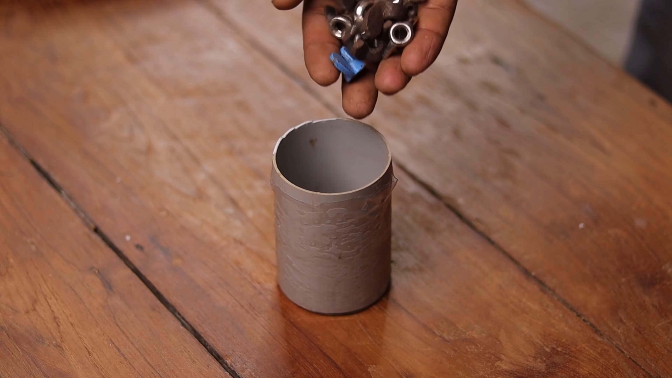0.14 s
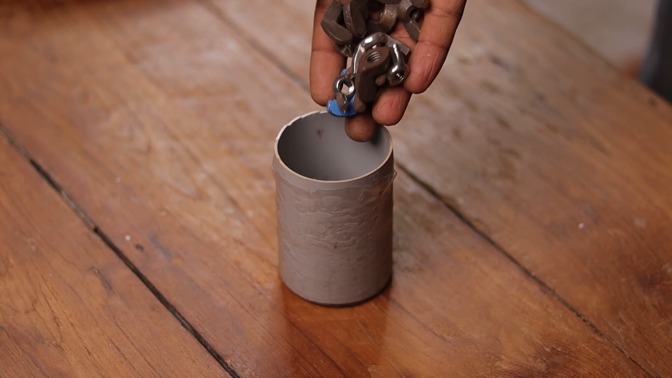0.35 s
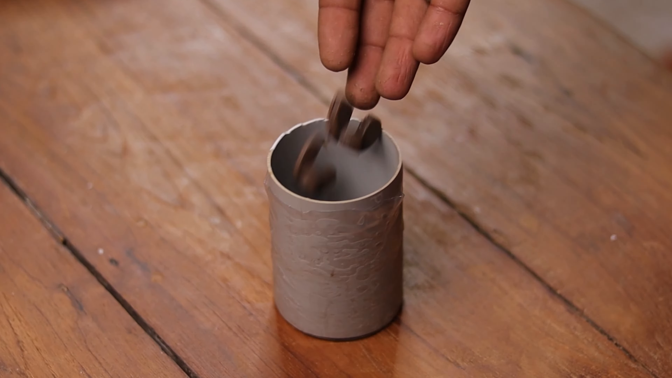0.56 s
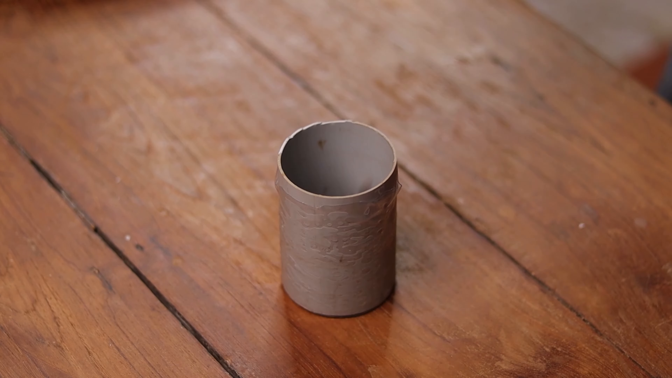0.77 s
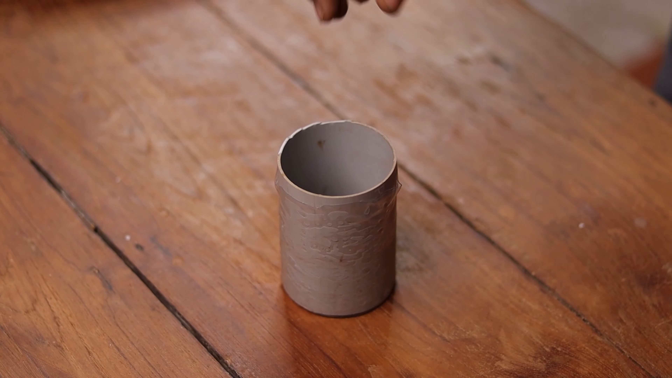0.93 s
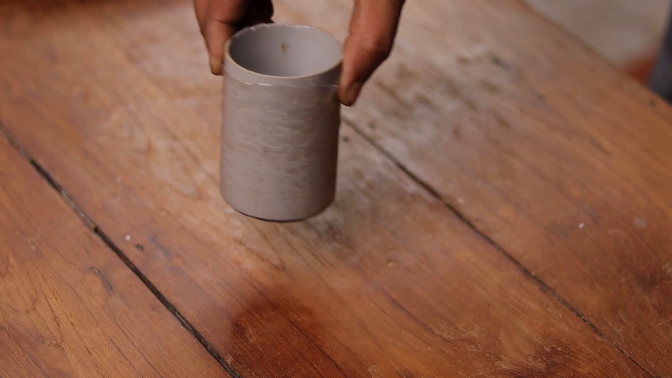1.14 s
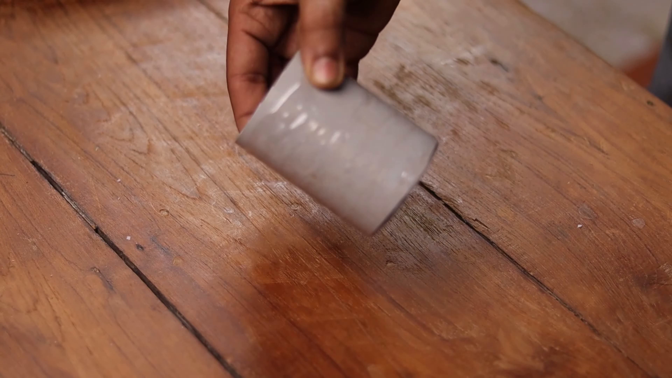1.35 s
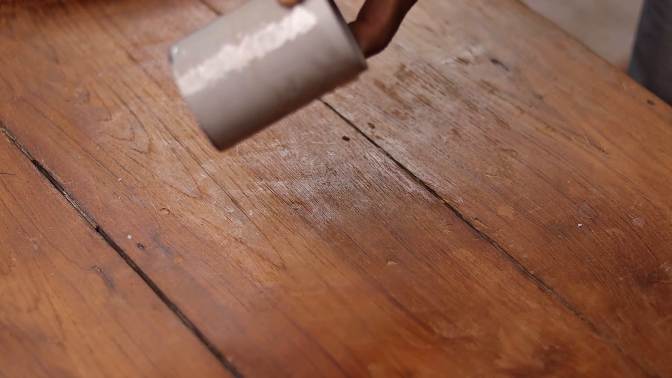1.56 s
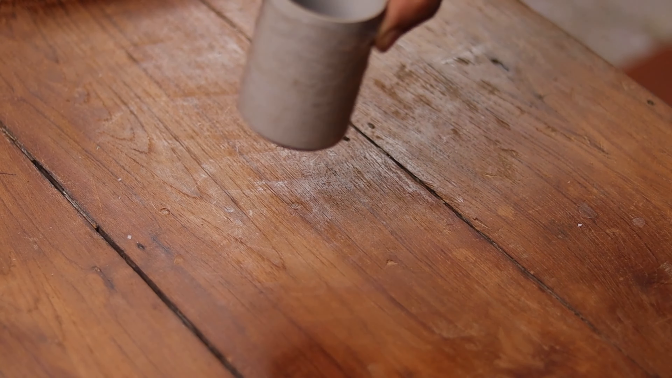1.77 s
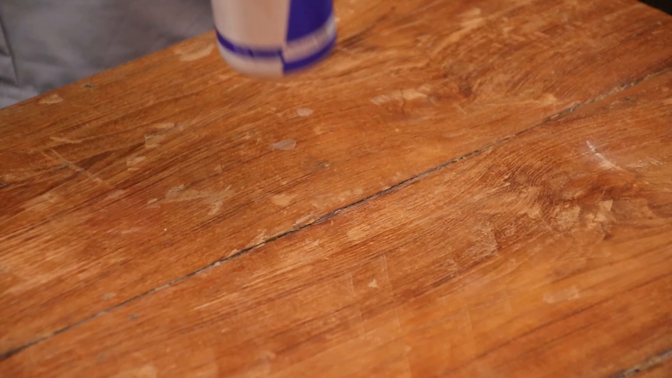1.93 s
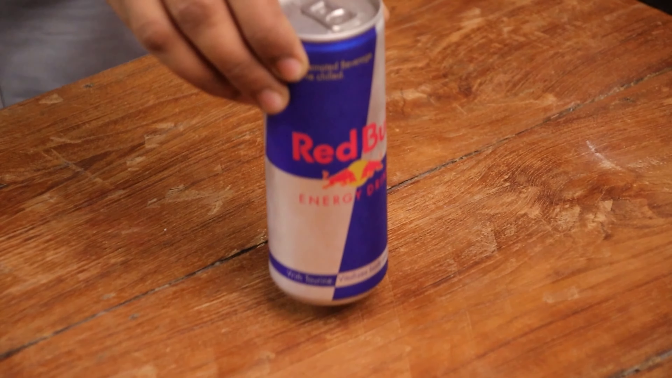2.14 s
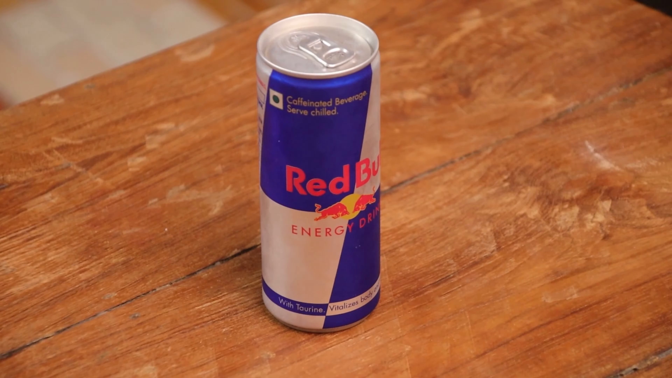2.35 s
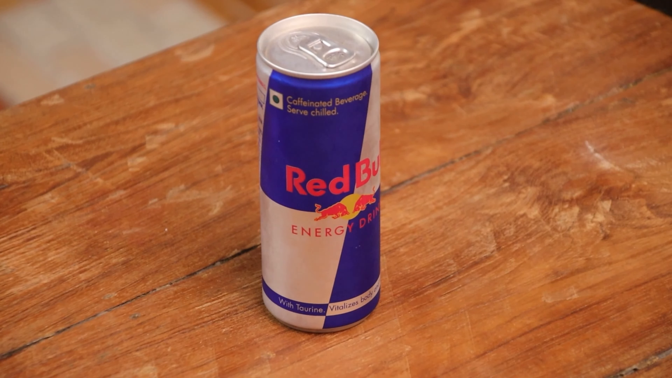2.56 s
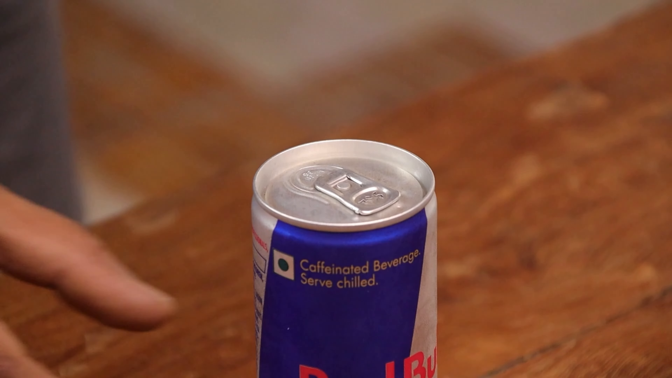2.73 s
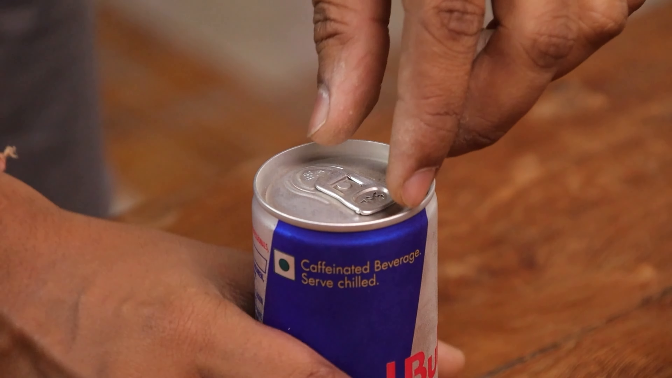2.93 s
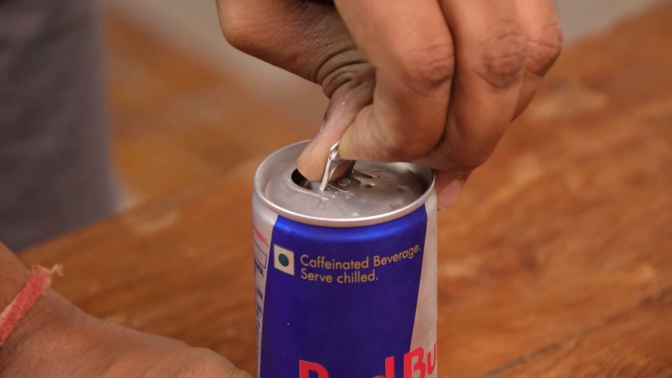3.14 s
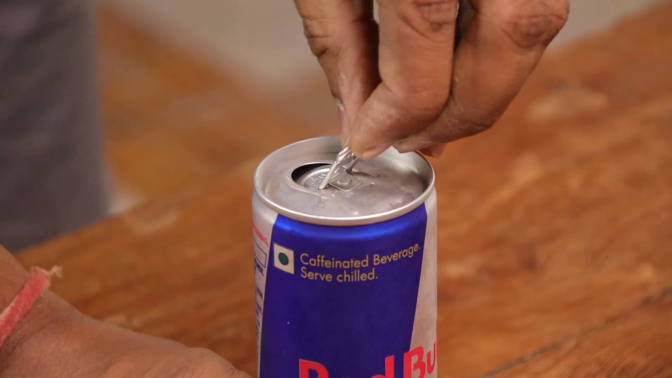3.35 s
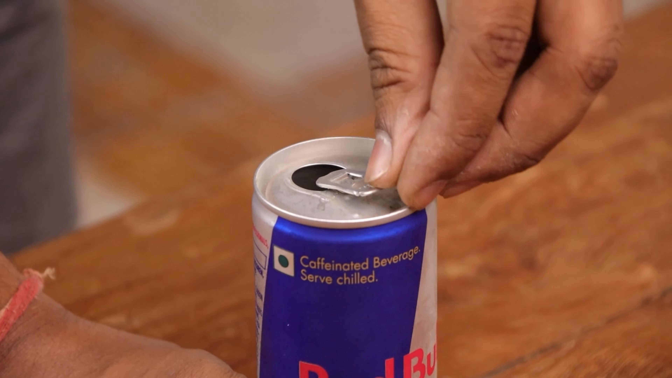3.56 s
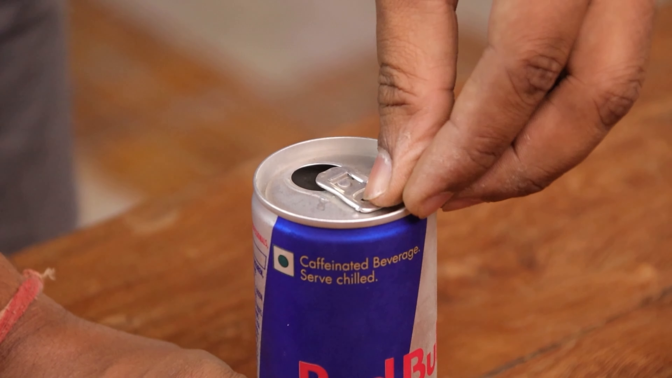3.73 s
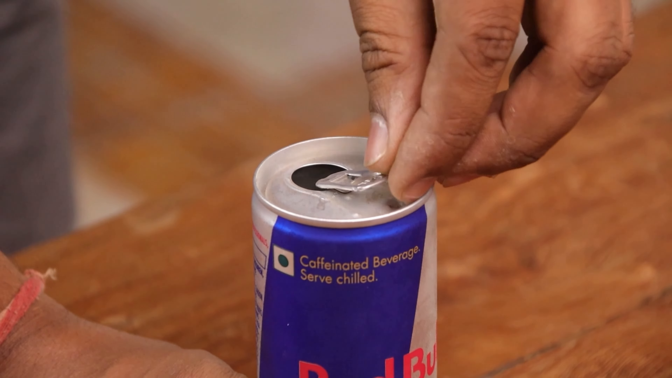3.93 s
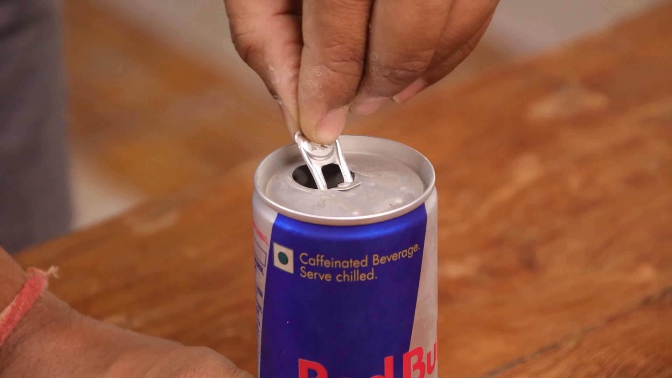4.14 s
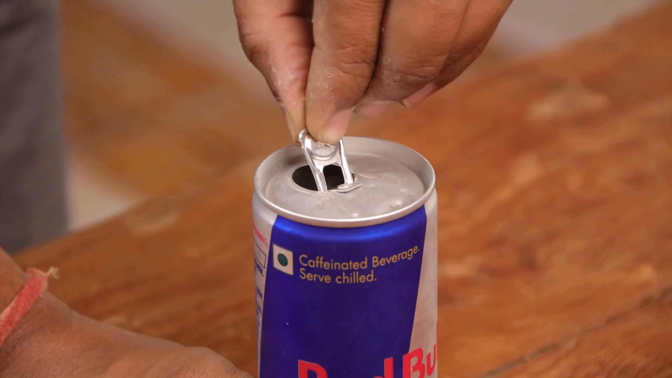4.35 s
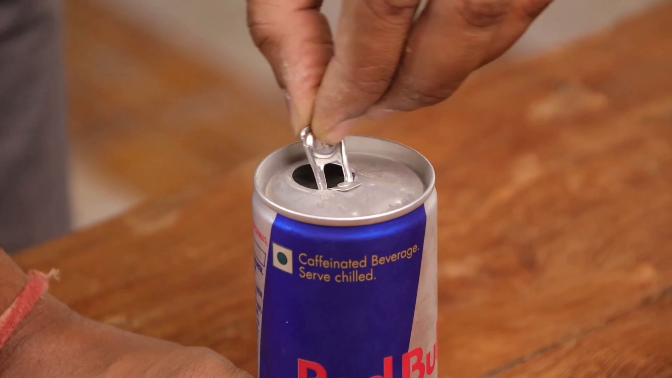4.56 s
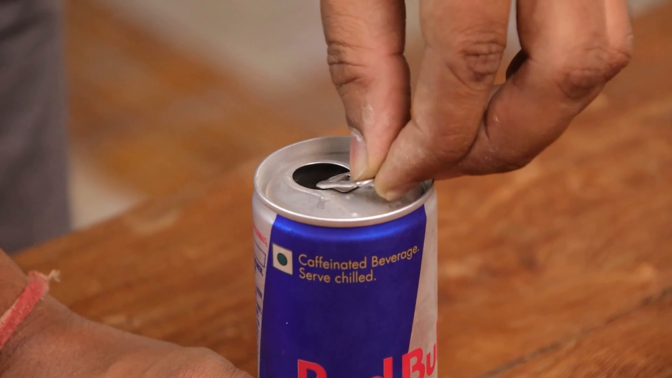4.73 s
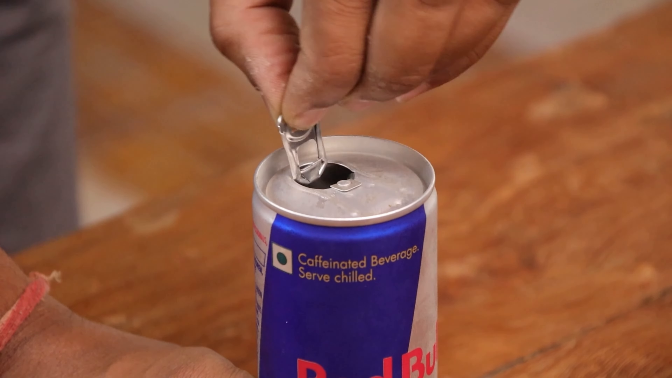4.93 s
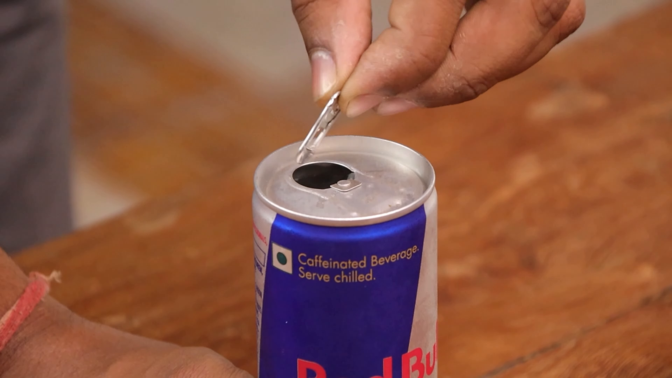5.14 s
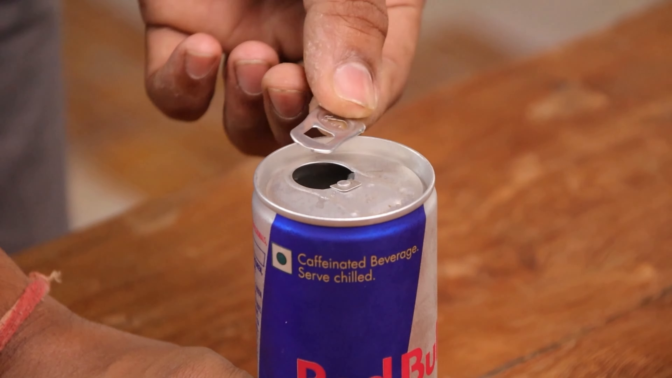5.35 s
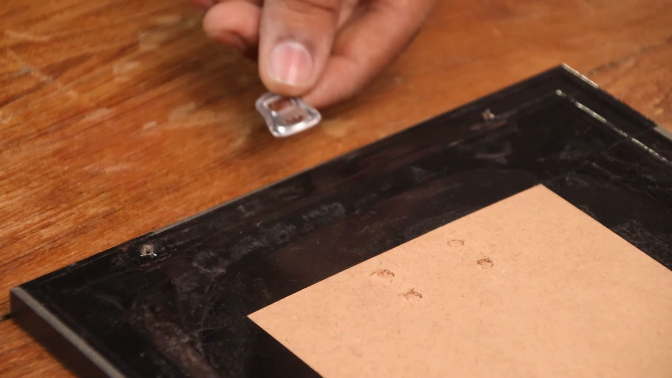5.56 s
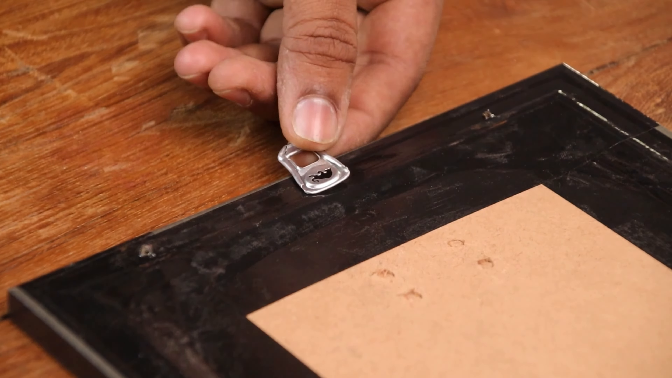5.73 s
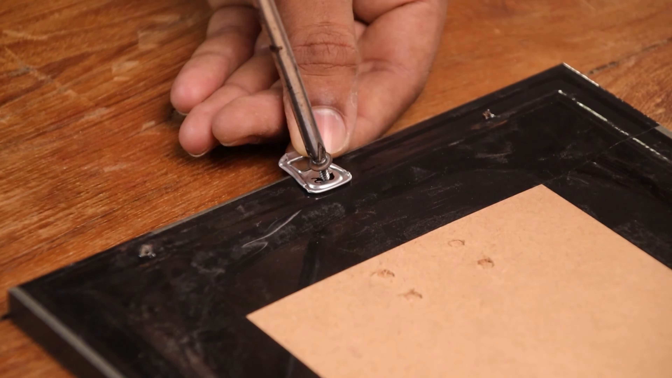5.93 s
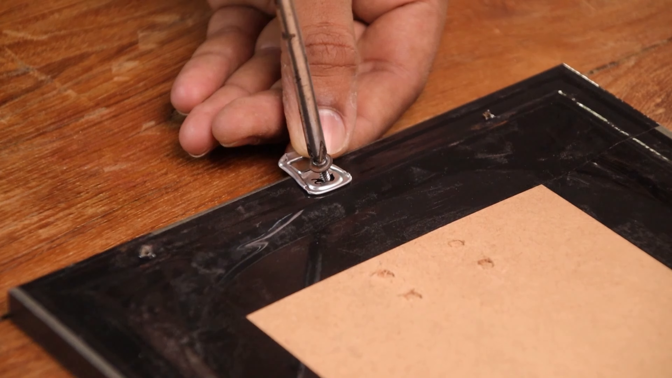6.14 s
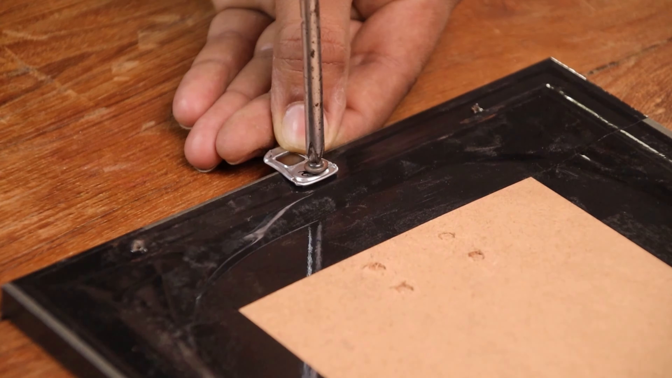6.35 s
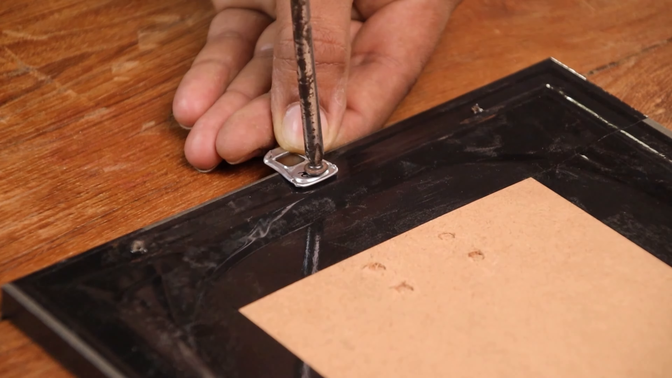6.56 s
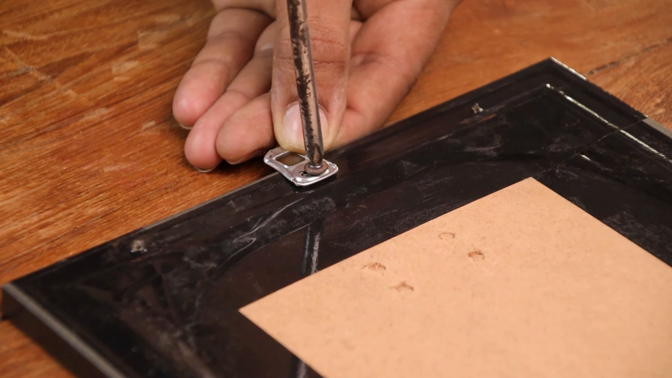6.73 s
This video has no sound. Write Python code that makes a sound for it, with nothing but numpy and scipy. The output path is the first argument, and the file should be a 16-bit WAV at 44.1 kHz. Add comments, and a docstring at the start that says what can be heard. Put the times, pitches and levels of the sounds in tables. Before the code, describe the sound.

Small metal hardware clatters into a plastic cup and is shaken, then a can cracks open with a hiss and its tab clicks until it snaps.

```python
"""Indoors: nuts and screws are poured into a plastic cup and shaken, as bursts of clatter, cup air and ringing steel.
A drink can is set down on a wooden table, with soft knocks made of decaying table tones. It opens with a hiss
of shaped noise and a crack. Its tab is bent to and fro with ringing metallic clicks until it snaps off.
Room tone, rumble, hum and fizz are steady noises that step to new levels; faint narrow noises swell and fade."""
import sys
import numpy as np
from scipy import signal
from scipy.fft import rfft, irfft, next_fast_len
from scipy.io import wavfile
from scipy.ndimage import uniform_filter1d, map_coordinates

SR = 44100
rng = np.random.default_rng(int(sys.argv[2]) if len(sys.argv) > 2 else 0)


def log_audio(samples):
    """Write samples as a 16-bit WAV file to the path given in sys.argv[1]."""
    # one column per channel
    frames = np.atleast_2d(samples).T
    # limit to full scale, then quantise
    limited = np.clip(frames, -1, 1)
    pcm = np.round(limited * 32767).astype(np.int16)
    wavfile.write(sys.argv[1], SR, pcm)


N = 299439  # length in samples

# ringing tones of the can's lid, before a small random detuning: f/Hz, relative level/dB
LID_TONES = [(835, -1), (1430, 1), (1720, 0), (1990, 3), (2430, -6), (2800, -4.5), (3110, 0.5), (3300, -1),
             (3700, -1.5), (4010, 1), (4250, -2.5), (4580, -5.5), (5250, -3), (5790, 2), (6300, 1),
             (7700, 0), (8300, 2.5), (9200, 2.5), (11200, 0), (12300, -0.5), (13400, -2.5)]


def amp(db):
    """Turns decibels into a plain gain."""
    return 10 ** (np.asarray(db) / 20)


def unit(x):
    """Scales a sound to an rms of 1."""
    return x / np.sqrt(np.mean(x ** 2) + 1e-20)


def along(points, hz):
    """Reads a curve of (Hz, value) points on a logarithmic frequency axis."""
    f, values = np.transpose(points)
    return np.interp(np.log(hz + 1), np.log(f + 1), values)


def filtered(x, response):
    """Multiplies the spectrum of x by a response, with padding so that the end does not wrap round."""
    length = next_fast_len(N + SR // 8)
    hz = np.fft.rfftfreq(length, 1 / SR)
    return irfft(rfft(x, length) * response(hz), length)[..., :N]


def modes(table):
    """Response of several resonances (Hz, width Hz, dB): a narrow one rings for longer."""
    def response(f):
        total = 0
        for k, (center, width, db) in enumerate(table):
            damping = 1j * f * width
            sign = (-1) ** k
            total = total + sign * amp(db) * damping / (center * center - f * f + damping)
        return total
    return response


def shape(points):
    """Response that follows a spectrum of (Hz, dB) points."""
    return lambda f: amp(along(points, f))


def below(top_hz):
    """A steep low-pass with a short smooth edge."""
    return lambda f: np.clip((top_hz - f) / 300 + .5, 0, 1) ** 2


def noise(response, grain_db=0., grain_hz=300, spread=0.99):
    """Stereo noise of rms 1 with a randomly wavering level; a small spread makes left and right more alike."""
    # how alike left and right are at full spread: f/Hz, likeness (1 = the same)
    likeness = [(60, 1), (240, 1), (950, 0.45), (3770, 0.15), (15000, 0.24)]
    knots = rng.standard_normal(int(N * grain_hz / SR) + 4)
    waver = map_coordinates(knots, [np.arange(N) * grain_hz / SR], order=1)
    source = amp(grain_db * waver) * rng.standard_normal((2, N))

    def mid_and_side(f):
        angle = spread * np.arccos(np.clip(along(likeness, f), -1, 1)) / 2
        return response(f) * [np.cos(angle), np.sin(angle)]
    mid, side = filtered(source, mid_and_side)
    return unit(np.array([mid + side, mid - side]))


def burst(response, seconds):
    """A short stereo noise of rms 1 through a response."""
    n = round(seconds * SR)
    spectrum = rfft(rng.standard_normal((2, n)))
    mid, side = irfft(spectrum * response(np.fft.rfftfreq(n, 1 / SR)), n)
    return unit(np.array([mid + 0.25 * side, mid - 0.28 * side]))


def add(track, s, sound):
    """Mixes a sound into a track at s seconds."""
    part = track[..., round(s * SR):][..., :sound.shape[-1]]
    part += sound[..., :part.shape[-1]]


def room(x):
    """The room's echo: a noise tail in which each frequency dies away at its own speed."""
    # how long the room rings: f/Hz, time to fall by 60 dB/s
    echo_times = [(200, 0.18), (1500, 0.46), (5000, 0.081), (14000, 0.057)]
    hz, t, grid = signal.stft(rng.standard_normal((2, SR // 2)), SR, nperseg=256)
    decay = amp(-60 * t / along(echo_times, hz)[:, None])
    mid, side = signal.istft(grid * decay, SR, nperseg=256)[1]
    tail = mid + .15 * side * np.array([[1], [-1]])
    delayed = np.pad(x, (260, 0))  # samples, about 6 ms
    return signal.fftconvolve(delayed[None], tail / np.linalg.norm(tail[0]), axes=1)[:, :N]


def background():
    """Rumble, room tone, hum and fizz: shaped noises whose levels jump at each step, after an opening silence."""
    # steps of the background: start t/s, rumble level/dB, room tone level/dB, hum level/dB, fizz level/dB
    steps = [(0.346, -74.5, -58.5, -79, -84), (1.978, -65, -64, -73.5, -84.5),
             (3.058, -57.5, -64, -47, -88), (3.31, -59.5, -64, -55, -70), (3.681, -57, -62, -48.5, -69),
             (4.729, -85, -60, -80.5, -69.5), (4.882, -62.5, -64, -68.5, -88)]
    # spectra of the four noises: f/Hz, relative level/dB
    rumble_spectrum = [(12, -40), (20, -23), (54, 1.5), (130, -4.5), (171, -6), (200, -16), (260, -37.5),
                       (440, -120)]
    tone_spectrum = [(150, -59.5), (200, -10.5), (286, -7), (460, -12.5), (711, -14), (1160, -17),
                     (1800, -18), (2740, -24.5), (5000, -30.5), (10500, -45), (12500, -59.5), (14000, -90)]
    hum_spectrum = [(90, -38.5), (140, -19), (185, -10), (208, 2.5), (240, -10), (330, -20), (480, -26.5),
                    (520, -17), (570, -30.5), (1200, -40), (2000, -70)]
    fizz_spectrum = [(500, -57), (1500, -9), (3500, 0), (8000, -5.5), (13000, -10.5), (15000, -12),
                     (15800, -29.5)]
    start, *levels = np.transpose(steps)
    step = np.searchsorted(start, np.arange(N) / SR) - 1
    started = step >= 0
    # a very short average keeps the jumps from clicking
    rumble, tone, hum, fizz = (uniform_filter1d(amp(db)[step] * started, size=64) for db in levels)
    out = rumble * noise(shape(rumble_spectrum))
    out += tone * noise(shape(tone_spectrum), grain_db=-1.4, grain_hz=6.5)
    out += hum * noise(shape(hum_spectrum))
    out += fizz * noise(shape(fizz_spectrum), grain_db=0.5, grain_hz=400)
    return out


def faint():
    """Faint narrow noises that swell and fade."""
    # start t/s, rise time/s, time to fall by 60 dB/s, f/Hz, width/Hz, level before the swell and fade/dB
    swells = [(2.05, .05, 1, 4900, 500, -79), (2.7, 0.013, 3, 3580, 700, -73.5),
              (3.074, 0.0042, 0.24, 3710, 150, -68), (3.133, 0.0086, 0.58, 1029, 139.8, -57.5),
              (5.15, 0.077, 3, 4900, 500, -79), (5.53, .003, 0.097, 3090, 700, -69),
              (5.648, .02, 0.47, 5287, 1600, -69), (6.36, 0.089, 1.2, 1779, 248, -61.5)]
    out, t = np.zeros((2, N)), np.arange(SR // 2) / SR
    ending = np.clip((.36 - t) / 0.029, 0, 1)
    for s, rise, t60, hz, width, db in swells:
        resonance = modes([(hz, width, 0)])
        band = burst(lambda f: resonance(f) ** 2, .5)
        add(out, s, band * amp(db - 60 * t / t60) * (1 - np.exp(-t / rise)) * ending)
    return out


def surges():
    """Gains of clatter, its treble, cup air and steel: each surge rises, holds and settles; surges add in power."""
    # surges of hardware in the cup: start t/s, hold time/s, clatter level/dB, cup air level/dB, steel level/dB
    moves = [(0.43, 0.024, -64, -67, -57.5), (0.487, 0.034, -39, -37, -47),
             (0.522, 0.027, -34.5, -38.5, -32), (0.605, 0.034, -36.5, -34.5, -34),
             (0.826, 0.0067, -41.5, -58, -41), (1.077, 0.078, -42, -43.5, -44.5),
             (1.363, 0.021, -57.5, -61, -63.5), (1.518, 0.011, -56.5, -54.5, -58.5),
             (1.813, 0.022, -58, -55, -59), (1.878, .01, -68, -70, -66)]
    # speed of settling in dB per second: clatter, its treble, cup air, steel
    settle_speeds = (96, 140, 114.5, 200)
    # the same four at rest, level/dB: the pieces never lie quite still
    rest_levels = (-60, -76, -63.5, -88)
    rise_s, early_stop_s = 0.006, .79
    cup_start_s, cup_end_s = .345, 1.978
    t = np.arange(N) / SR
    power = amp(2 * np.array(rest_levels))[:, None] * np.ones(N)
    early_stopping = np.clip((early_stop_s - t) / 0.0069, 0, 1)
    for s, hold, clatter_db, air_db, steel_db in moves:
        db = np.array([clatter_db, clatter_db, air_db, steel_db])[:, None]
        rise = np.clip((t - s) / rise_s, 0, 1)
        if s < early_stop_s:
            rise = rise * early_stopping
        fall = np.outer(settle_speeds, np.maximum(t - s - rise_s - hold, 0))
        power = power + (rise * amp(db - fall)) ** 2
    return np.sqrt(power) * (t > cup_start_s) * (t < cup_end_s)


def hardware():
    """Many small collisions: a broad clatter, the cup's air column and the ringing steel."""
    # spectrum of the clatter: f/Hz, relative level/dB
    clatter_spectrum = [(53, -63.5), (90, -23.5), (403, -13.5), (550, -20), (817, -9), (1140, -7.5),
                        (2910, -16), (4230, -17.5), (8060, -24), (9510, -24), (10300, -25), (13000, -23.5)]
    # resonances of the air in the cup: f/Hz, width/Hz, relative level/dB
    cup_air = [(819, 79, 2), (970, 95, -8.5)]
    # resonances of the steel pieces: f/Hz, width/Hz, relative level/dB
    steel_tones = [(6650, 240, -8), (9506, 34, -3), (11060, 42, -4.5), (11990, 41, -6), (12600, 40, -30),
                   (12800, 39, -5.5)]
    # single pieces landing: t/s, level before filtering/dB
    landings = [(0.4853, -38), (0.4989, -23.5), (0.5279, -19), (0.5484, -35), (0.609, -38.5), (0.6394, -40),
                (0.83, -28.5), (0.8355, -33.5), (1.081, -35.5)]
    treble_from_hz, top_hz = 4400, 13100
    clatter, treble, air, jingle = surges()
    body = noise(shape(clatter_spectrum), grain_db=2.5, grain_hz=299, spread=0.79)
    high = filtered(body, lambda f: 1 / (1 + (treble_from_hz / (f + 1)) ** 4))
    out = clatter * (body - high) + treble * high
    out += air * noise(modes(cup_air), grain_db=3.0, grain_hz=59.67, spread=0.19)
    for hz, width, db in steel_tones:  # each tone wavers at its own moments
        ringing = noise(modes([(hz, width, 0)]), grain_db=6.5, grain_hz=60.2, spread=1.0)
        out += jingle * amp(db - 4.5) * ringing
    t = np.arange(SR // 10) / SR
    cracks = np.zeros(N)
    for s, db in landings:
        add(cracks, s, amp(db - 60 * t / 0.04) * rng.standard_normal(len(t)))
    crack_shape = shape([(150, -69.0), (400, -1), (1000, 0.0), (5000, -2.5), (13000, -21.0)])
    cracks = filtered(cracks, lambda f: crack_shape(f) + 2.68 * modes(cup_air)(f))
    return filtered(out + cracks, below(top_hz))


def knocks():
    """Soft contacts ring the table top; each favours the tones near its pitch."""
    # knocks from the cup and then from the can: t/s, level/dB, favoured f/Hz
    contacts = [(0.345, -38.5, 364), (0.396, -30, 440), (0.833, -31, 450), (0.848, -36, 368),
                (1.063, -30.5, 479), (1.376, -46, 754), (1.468, -37.5, 326), (1.499, -38.5, 288),
                (1.528, -33, 175), (1.54, -28, 417), (1.555, -38.5, 339), (1.608, -41.5, 298),
                (1.666, -36, 298), (1.735, -35.5, 277), (1.745, -31.5, 603), (1.774, -32, 384),
                (1.807, -39, 229), (1.851, -38, 215), (1.916, -48, 375), (2.249, -31, 410),
                (2.262, -41, 527), (2.277, -36, 152)]
    # tones of the table top: f/Hz, relative level/dB, ring time that sets half of the decay/s
    table_tones = [(104.5, -14, 0.12), (140, 4.5, 0.068), (252.8, 4, 0.031), (303.7, 5.5, 0.033),
                   (365.6, 5, 0.03), (451, 0.5, 0.07), (571, 3, 0.034), (698, 5.5, 0.018), (920, -3, 0.028),
                   (1110, -7.5, 0.03)]
    # resonances of the full can's wall: f/Hz, width/Hz, relative level/dB
    can_wall = [(1520, 160, 3.5), (3680, 210, -5), (5760, 380, -25)]
    can_from_s = 2
    contact_s = 0.036  # what knocks the table also damps it: sets the other half of the decay
    out, t = np.zeros(N), np.arange(SR // 6) / SR
    hz, level, life = np.transpose(table_tones)[..., None]
    for s, db, pitch in contacts:
        near = -6 * np.minimum(np.abs(np.log2(hz / pitch)), 1.5)  # weaker by 6 dB an octave
        near += rng.normal(0, 2, hz.shape)
        decay = 30 * t / life + 30 * t / contact_s
        ring = (amp(level + near - decay) * np.sin(2 * np.pi * hz * t)).sum(0)
        ring *= 1 - np.exp(-t / 0.012)  # soft start
        knock = ring / np.abs(ring).max()
        if s > can_from_s:
            wall = burst(lambda f: modes(can_wall)(f) * (f < 8000), len(t) / SR).mean(0)
            knock = knock + amp(-20.5 - 60 * t / 0.11) * wall
        add(out, s, amp(db) * knock)
    return filtered(out, lambda f: f ** 2 / (f ** 2 + 80 ** 2))  # removes the deepest bass


def set_down():
    """The loose tab touches a hard frame and rings faintly."""
    # resonances of the frame: f/Hz, width/Hz, relative level/dB
    frame_tones = [(2700, 216, -3), (3200, 500, -8), (3780, 127, 3.5), (4300, 2200, -15), (7740, 260, -17)]
    start_s, level_db, t60_s = 5.505, -62, .8
    out, t = np.zeros((2, N)), np.arange(SR // 2) / SR
    ring = burst(lambda f: modes(frame_tones)(f) * (f > 2200) * (f < 9000), .5)
    add(out, start_s, amp(level_db - 60 * t / t60_s) * (1 - np.exp(-t / 0.0056)) * ring)
    return out


def tab():
    """The ring of the free tab, smeared by the room into fading narrow bands over a wash; the treble dies first."""
    # resonances of the tab: f/Hz, width before a widening by a tenth/Hz, relative level/dB
    tab_tones = [(1580, 42, 5), (3040, 42.5, -3.5), (3474, 130, -5), (4230, 20.4, -3.5), (4780, 95, -8.5),
                 (6300, 70, -7), (7010, 130, -11), (8860, 180, -9), (9570, 62, -9), (12480, 260, -19)]
    snap_s, level_db = 4.953, -47.5
    low_t60_s, high_t60_s, split_hz = 0.61, 0.38, 5500
    out, t = np.zeros((2, N)), np.arange(SR // 2) / SR
    wash = shape([(1000, -69.5), (1300, -3), (1800, -17), (2500, -46), (3000, -25.0),
                  (6000, -34), (9000, -23), (13000, -30), (15000, -60)])
    resonances = modes(np.array(tab_tones) * [1, 1.1, 1])
    ring = lambda f: resonances(f) + wash(f)
    low = amp(-3.0 - 60 * t / low_t60_s) * burst(lambda f: ring(f) * (f < split_hz), .5)
    high = amp(-3.5 - 60 * t / high_t60_s) * burst(lambda f: ring(f) * (f >= split_hz), .5)
    onset = (1 - np.exp(-t / 0.0013)) * (1 + amp(-60 * t / 0.032))  # briefly stronger at first
    add(out, snap_s, amp(level_db) * (low + high) * onset)
    return out


def gas():
    """Pressure escapes through the cracked score line as hiss; tearing metal is duller and rougher."""
    # stretches of gas and tearing: start t/s, end t/s, start level/dB, end level/dB, dullness (0 gas to 1 tearing)
    vents = [(3.103, 3.267, -44, -60, 0.27), (3.255, 3.264, -44, -34.5, 0), (3.427, 3.433, -46, -46, 0.7),
             (3.263, 3.3, -19.5, -24.5, 0.06), (3.3, 3.335, -33, -63.5, 0.8),
             (3.372, 3.42, -36.5, -36, 0.85), (3.438, 3.439, -33, -43.5, 0.8),
             (3.766, 3.769, -45, -47, 0.63), (4.29, 4.305, -53, -63.5, 1)]
    # spectra of the gas jet and the tearing metal: f/Hz, relative level/dB
    jet_spectrum = [(900, -61.5), (1500, -26), (2000, -14.5), (2700, -24), (4000, -11), (5500, -5.5),
                    (7500, 1.5), (10000, -1.5), (13500, -3.5), (15000, -12.5), (15900, -40)]
    tear_spectrum = [(530, -54), (900, -23), (2150, -6.5), (2690, -12), (3070, -3), (4440, -1.5),
                     (9630, -23.5), (15500, -37)]
    jet = noise(shape(jet_spectrum), spread=.35)
    tear = noise(shape(tear_spectrum), grain_db=2.5, grain_hz=500, spread=.35)
    out = np.zeros((2, N))
    for start, end, start_db, end_db, dull in vents:
        a, b = round(start * SR), round(end * SR)
        fade = amp(np.linspace(start_db, end_db, b - a)) * signal.windows.tukey(b - a, .15)
        out[:, a:b] += fade * (np.sqrt(1 - dull) * jet[:, a:b] + np.sqrt(dull) * tear[:, a:b])
    return out


def push(t):
    """One low push of air: a short pulse that swings up and then below zero."""
    u = t / 0.00046
    return u * (2.6 - u) * np.exp(-u)


def buckles():
    """The lid buckles as it tears open: a strong push, and the lid's lowest tone."""
    # buckles of the lid: t/s, level/dB
    bends = [(3.2872, -26.5), (3.2977, -18), (3.4419, -30), (3.4451, -15.5), (3.4485, -22.5)]
    out, t = np.zeros(N), np.arange(SR // 6) / SR
    for s, db in bends:
        hz = LID_TONES[0][0] * (1 + rng.normal(0, .012))
        ring = amp(-7.5 - 60 * t / .03) * np.sin(2 * np.pi * hz * t)
        add(out, s, amp(db) * (push(t) + ring))
    return out


def can():
    """Each slip of the tab rings the lid, damped by the fingers, with a crack on top and a push through the can."""
    # clicks of tab and lid: t/s, level/dB, favoured f/Hz, relative lid tone level/dB, relative treble level/dB
    slips = [(3.111, -39, 5130, -24, -20), (3.262, -18, 2940, -16, -1), (3.2865, -7.5, 4130, -21, -11.5),
             (3.288, -15.5, 2000, -33, -25.5), (3.2978, -10, 1912, -20, -21),
             (3.3763, -30, 1960, -21.5, -4), (3.3822, -24.5, 5500, -18, -5.5),
             (3.387, -33, 2080, -18.5, -12), (3.4322, -21.5, 4203, -4, -5), (3.4423, -11, 4000, -17, -3.5),
             (3.4451, -9, 2850, -9.5, -10.5), (3.4491, -8, 2525, -44, -15.5), (3.5254, -52, 2500, -24, 3),
             (3.569, -48.5, 3970, -23, -2), (3.598, -55, 3780, -23, -8), (3.6102, -19.5, 3630, -7.5, 3),
             (3.7243, -52, 3130, 5, -10.5), (3.753, -40, 3260, -0.5, -16), (3.7685, -36, 3160, -13.5, -19),
             (3.87, -48, 3220, -6, -17), (3.875, -37.5, 3620, -18, -17), (3.877, -37, 3220, 10, -14),
             (4.022, -47, 3205, 6, -26), (4.0343, -35.5, 3220, 0, -27), (4.0552, -9, 3250, -9.5, -11.5),
             (4.062, -17.5, 3060, -1, -11.5), (4.1867, -46.5, 3200, -2.5, -10),
             (4.48, -35.5, 3330, -13, -18.5), (4.5162, -23, 3100, -21, -27.5),
             (4.5163, -24, 2160, -8.5, -33), (4.5806, -51, 4640, 14, 1.5), (4.5916, -51.5, 2200, 13, -15.5)]
    grip_s = 3.5  # from here the fingers grip the raised tab
    thump_db = -27.5  # push through the can, relative to the click
    out, t = np.zeros(N), np.arange(SR // 6) / SR
    seconds = len(t) / SR
    lid_hz, level = np.transpose(LID_TONES)[..., None]
    for s, db, pitch, lid_db, treble_db in slips:
        # base damping time in seconds, and level of the lingering ring
        t60, linger_db = (0.025, -28) if s < grip_s else (0.015, -47)
        hz = lid_hz * (1 + rng.normal(0, .012, lid_hz.shape))  # the bent lid is never tuned the same twice
        treble_floor = np.where(hz > 5000, treble_db - 4, -60)
        near = -30 * np.abs(np.log2(hz / pitch)) + .1  # tones near the favoured pitch win
        strength = np.maximum(treble_floor, near)
        strength[:2, 0] = thump_db - 3, lid_db - 7.5
        strength += rng.normal(0, 2, hz.shape)
        life = t60 * np.minimum(3000 / hz, 1.15) ** .5  # high tones die first
        life[1] *= 2.2  # the lid's second-lowest tone escapes the fingers
        ring = (amp(level + strength - 60 * t / life) * np.sin(2 * np.pi * hz * t)).sum(0)
        bright_noise = np.diff(rng.standard_normal(len(t) + 1))
        crack = amp(treble_db - 3 - 60 * t / t60 / 1.1) * bright_noise
        # the whole shell rattles on
        shell = modes([(1430, 250, lid_db + 0.5), (pitch, .2 * pitch, 0), (8000, 7000, treble_db - 7.5)])
        shudder = amp(-15.5 - 60 * t / t60 / 3.2) * burst(shell, seconds).mean(0)
        narrow = modes([(pitch, .05 * pitch, 0)])
        linger = amp(linger_db - 60 * t / .2) * burst(narrow, seconds).mean(0)
        onset = 1 - np.exp(-t / .0003)
        thump = amp(thump_db) * push(t)
        add(out, s, amp(db) * ((ring + crack + shudder + linger) * onset + thump))
    return out


def scene():
    """Sums all the sources, with room echoes for the can, the gas and the knocks."""
    clicks, thuds, hiss = can() + buckles(), knocks(), gas()
    echoes = amp(-27.0) * room(clicks + hiss.mean(0)) + amp(-21.5) * room(thuds)
    cup_and_table = hardware() + thuds
    opening = clicks + hiss
    loose_tab = tab() + set_down()
    return background() + faint() + cup_and_table + opening + loose_tab + echoes


def record(dry):
    """Removes everything above a band limit of about 15.9 kHz."""
    return filtered(dry, below(15900))


dry = scene()
out = record(dry)
log_audio(out)
```